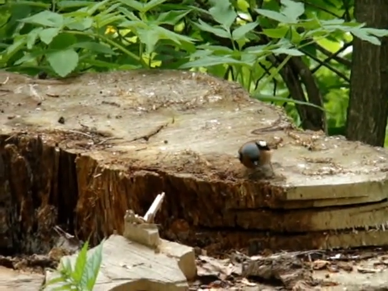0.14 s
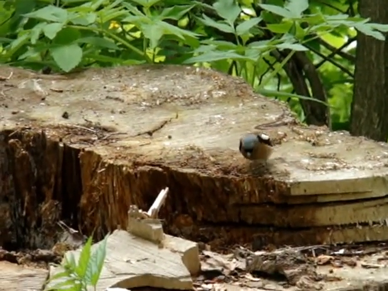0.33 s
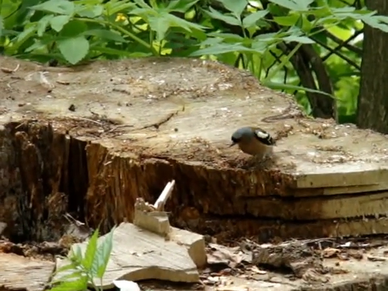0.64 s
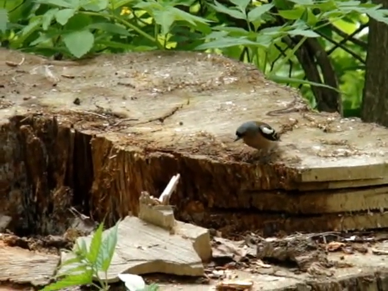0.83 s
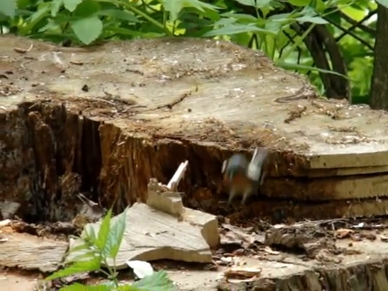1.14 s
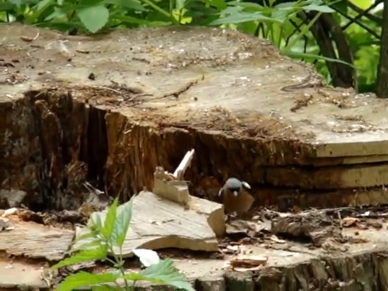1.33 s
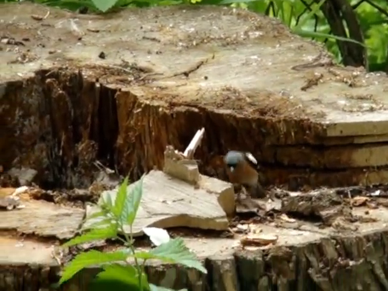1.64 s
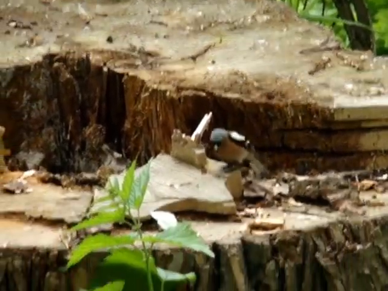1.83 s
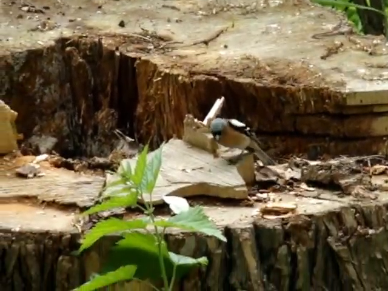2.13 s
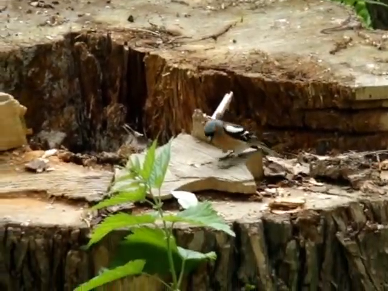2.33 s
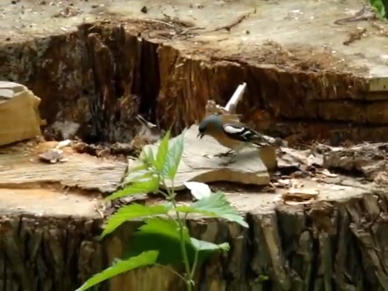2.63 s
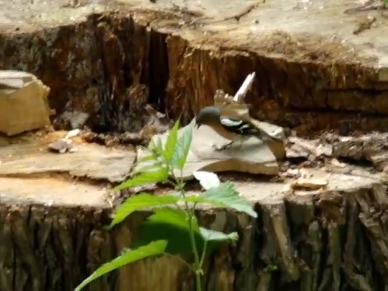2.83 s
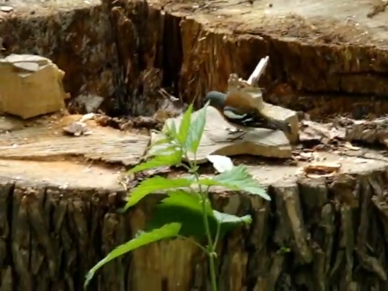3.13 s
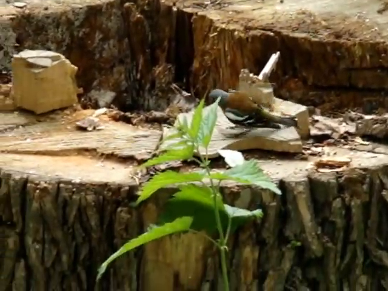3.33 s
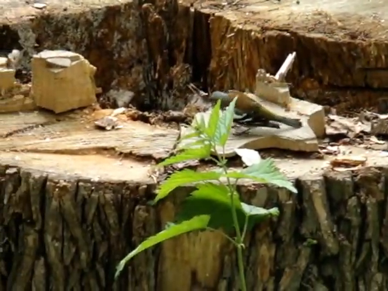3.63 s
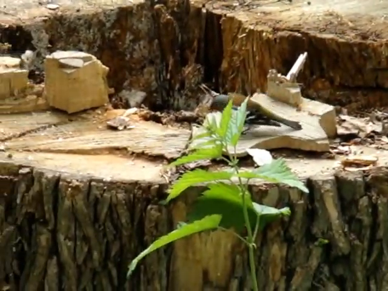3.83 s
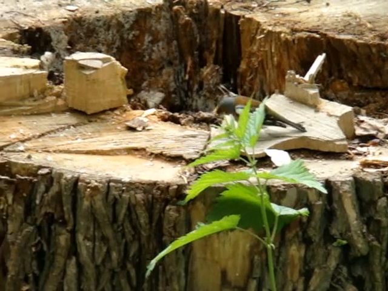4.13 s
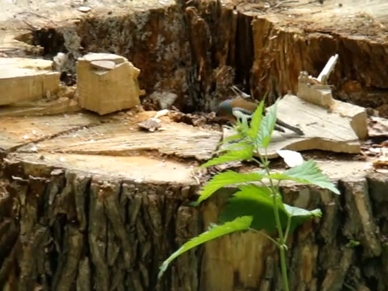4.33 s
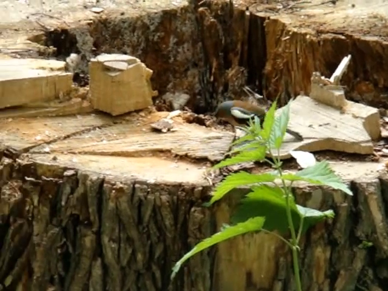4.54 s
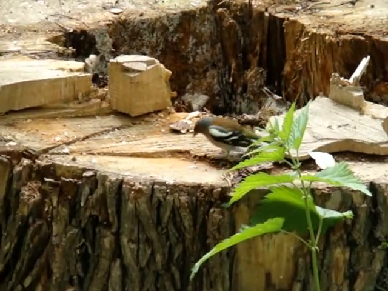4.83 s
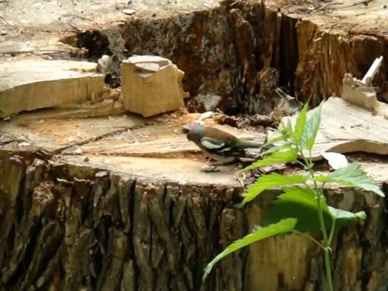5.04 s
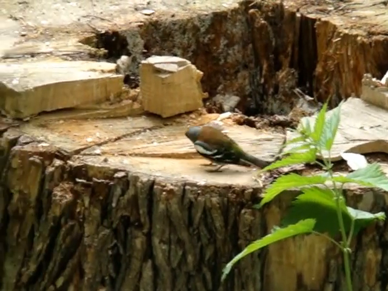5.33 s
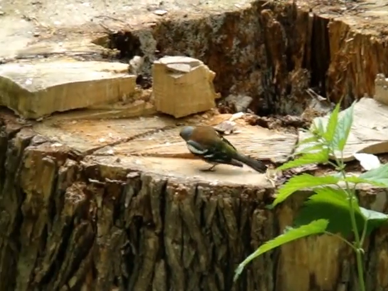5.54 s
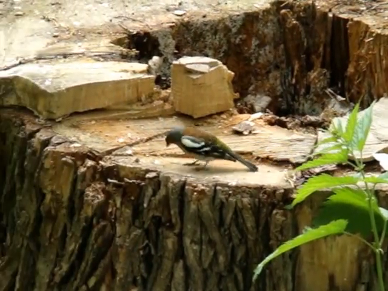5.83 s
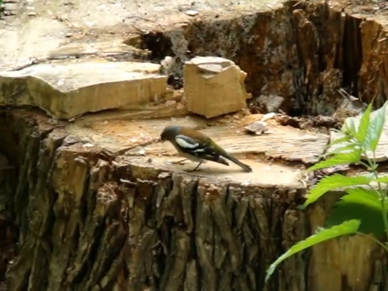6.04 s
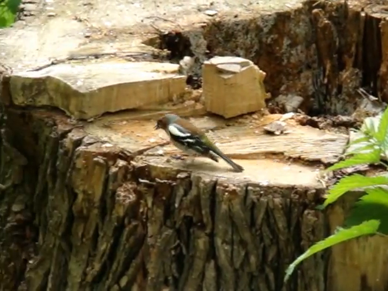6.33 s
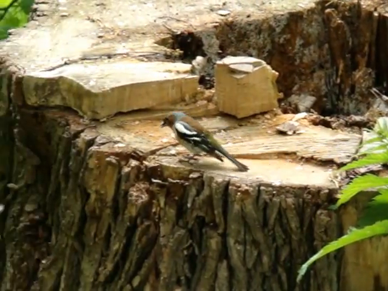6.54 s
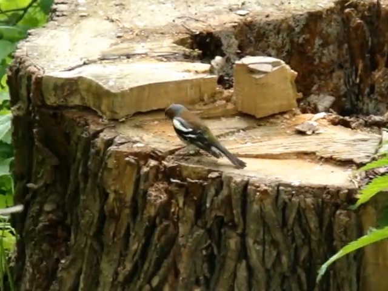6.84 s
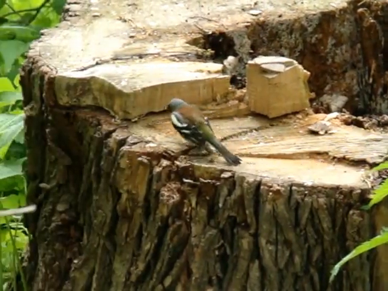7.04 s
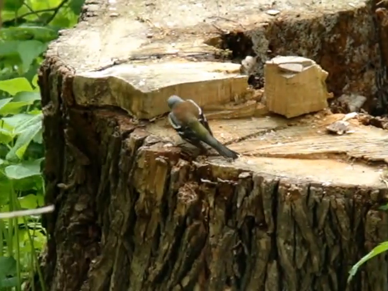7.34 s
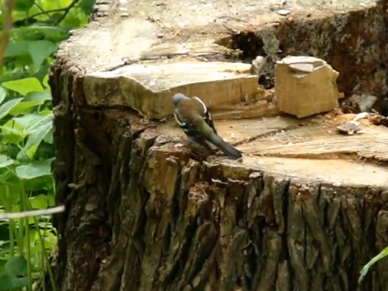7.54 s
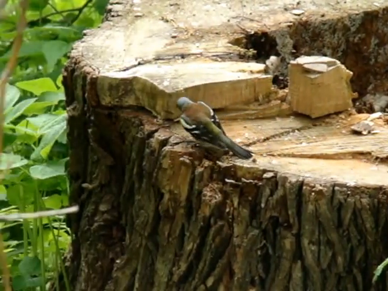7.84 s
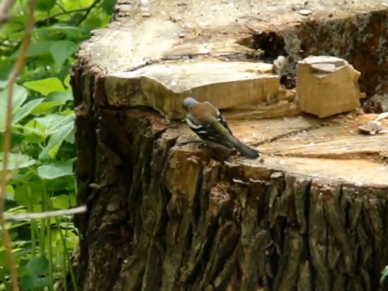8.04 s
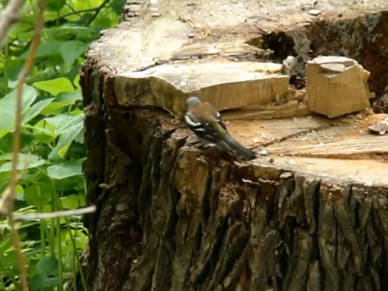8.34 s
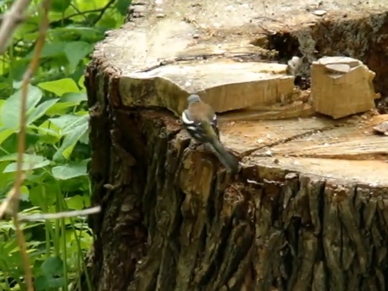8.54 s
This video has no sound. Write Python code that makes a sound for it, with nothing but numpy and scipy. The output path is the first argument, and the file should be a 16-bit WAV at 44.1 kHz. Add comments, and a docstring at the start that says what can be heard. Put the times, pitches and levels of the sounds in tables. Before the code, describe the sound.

A small songbird delivers the same rapid, descending song twice, each growing from thin, faint notes to strong sweeping whistles and a buzzy final flourish. Soft far chips follow the first song; clear falling whistles and a rising high hiss fill the gap. Everything sits over a gentle distant rush, in an open wood with short, leafy reverberation, heard in mono from a moderate distance.

```python
"""A chaffinch sings twice in a wood: thin notes, buzz-and-arch pairs, a trill, three swoops and a flourish.
Each syllable is a whistle with drawn pitch and level, some warbled into a buzz, echoed by trunks and leaves.
Farther birds, built the same way with other echo levels, call around and between the songs.
A high hiss of shaped noise swells between the songs; noise makes a soft rush and leaves, a sine a low hum."""
import sys
import numpy as np
from scipy import signal
from scipy.fft import rfft, irfft, next_fast_len
from scipy.io import wavfile
from scipy.ndimage import uniform_filter1d, map_coordinates

SR = 44100
rng = np.random.default_rng(int(sys.argv[2]) if len(sys.argv) > 2 else 0)


def persist_wave(psi):
    """Save psi, clipped to +-1, as 16-bit WAV."""
    counts = np.round(np.clip(psi, -1, 1) * 32767).astype(np.int16)
    wavfile.write(sys.argv[1], SR, np.atleast_2d(counts).T)


N = 383229

# Gestures and notes: nominal values, before the length and pitch ratios, level offsets and group gains.
# Thin lead-in note: time_s, pitch_hz, level_db
LEAD = [(0, 6270, -32), (.012, 6260, -5.5), (.018, 6250, -8), (.021, 5020, -6), (.028, 5500, 4),
        (.038, 5780, -12)]
# Buzz: time_s, pitch_hz, level_db, warble_depth_hz, warble_rate_hz
BUZZ = [(0, 5250, -16, 400, 180), (.012, 4900, -7, 500, 180), (.034, 4500, -1.5, 600, 130),
        (.046, 4150, 0, 700, 80), (.068, 3850, -2.5, 900, 72), (.079, 3900, -12, 900, 72)]
# Arch that closes a pair: time_s, pitch_hz, level_db
ARCH = [(0, 4840, -19), (.007, 5850, -1), (.014, 6630, -5.5), (.021, 6990, -8), (.0255, 8260, -34),
        (.032, 6530, -11.5), (.039, 5660, 0.5), (.046, 4860, -9.5)]
# Trill note: time_s, pitch_hz, level_db
TRILL = [(0, 4616, -14.5), (.009, 4940, -9.5), (.013, 6580, -18), (.017, 3925, -3), (.028, 3460, -2),
         (.036, 2750, -25), (.042, 3970, 1), (.047, 4700, -15)]
# Dip before a swoop: time_s, pitch_hz, level_db, warble_depth_hz, warble_rate_hz
DIP = [(0, 5050, -9, 200, 250), (.003, 4650, -1, 200, 250), (.008, 4200, -1, 100, 250),
       (.011, 3850, -9, 100, 250), (.016, 4450, -2, 200, 250), (.022, 5150, -12, 250, 250)]
# Quick flick before a swoop: time_s, pitch_hz, level_db
FLICK = [(0, 5300, -12), (.005, 4700, -10), (.008, 4000, 2), (.011, 3600, -12)]
# Swoop: time_s, pitch_hz, level_db
SWOOP = [(0, 2945, -20), (.008, 3260, -0.5), (.019, 3865, 0.5), (.024, 4200, -11), (.029, 3450, -6),
         (.035, 3190, 0)]
# Tumble that ends a swoop: time_s, pitch_hz, level_db
TUMBLE = [(0, 3357, -4), (.009, 2582, -19.5), (.019, 1747, -21), (.037, 3250, -9), (.054, 1790, -17.5)]
# Echoing ring at the start of each trill note and just before each swoop: time_s, pitch_hz, level_db
RING = [(0, 4494, -3.5), (.008, 4793, -2.5), (.018, 4950, -9)]
# Short rasp: time_s, pitch_hz, level_db, warble_depth_hz, warble_rate_hz
RASP = [(0, 3400, -25, 502, 199), (.008, 4210, 1, 804, 209), (.018, 4300, 1, 800, 200)]
# Sizzle: time_s, pitch_hz, level_db, warble_depth_hz, warble_rate_hz
SIZZLE = [(0, 3400, -14, 99.5, 172), (.005, 4900, -1, 293, 181.2), (.011, 8100, -5, 970, 168.4),
          (.02, 7540, -16, 1180, 168.7), (.03, 6400, -3, 1070, 170), (.041, 5300, -3, 1190, 168),
          (.048, 4860, -25, 1036, 166)]
# Tick on the slur: time_s, pitch_hz, level_db
TICK = [(0, 3160, -15), (.005, 3800, 1), (.01, 4900, -14)]
# Slur after the sizzles: time_s, pitch_hz, level_db
SLUR = [(0, 2000, -14), (.008, 2750, -6), (.016, 3250, 0), (.024, 3200, 0), (.032, 2750, -5),
        (.042, 2100, -12)]
# Final flourish: time_s, pitch_hz, level_db, warble_depth_hz, warble_rate_hz
FLOURISH = [(0, 3300, -12, 0, 74), (.004, 3650, 4, 0, 74), (.012, 4100, 4, 100, 74),
            (.018, 4400, -8, 800, 74), (.028, 4350, -3, 850, 67), (.064, 4300, -3.5, 850, 67),
            (.072, 3950, 3, 350, 190), (.088, 3600, -4, 450, 190), (.15, 2100, -19, 300, 190)]
# Thin high note: time_s, pitch_hz, level_db
THIN = [(0, 6350, -10), (.01, 6250, 0), (.028, 6200, -6), (.033, 5370, -14), (.06, 5350, -10)]

# Far chip: time_s, pitch_hz, level_db
CHIP = [(0, 2595, 3), (.005, 2390, -4.5), (.011, 2177, -3), (.017, 1900, -7), (.024, 1550, -20.5)]
# Far low pip: time_s, pitch_hz, level_db
PIP = [(0, 1505, 1), (.012, 1410, 2.5), (.03, 1370, -22)]
# Far falling whistle: time_s, pitch_hz, level_db
WHISTLE = [(0, 6600, -9), (.02, 5650, -2), (.038, 4850, 0), (.052, 4480, -2), (.072, 4250, -11)]
# Far note that falls, rises and falls again: time_s, pitch_hz, level_db
HOOK = [(0, 6200, -8), (.025, 5100, 0), (.048, 4400, -2), (.065, 4650, 0), (.085, 5100, -1),
        (.1, 4600, -10)]
# Far sagging note: time_s, pitch_hz, level_db
SAG = [(0, 5000, -11), (.07, 4920, -5), (.12, 4530, -3), (.17, 3940, -2)]
# Far downward slur: time_s, pitch_hz, level_db
DOWNSLUR = [(0, 3440, -9), (.018, 3500, 3), (.032, 3150, 3), (.045, 2780, -18)]
# Far upward slur: time_s, pitch_hz, level_db
UPSLUR = [(0, 2974, -13), (.025, 2975, -7), (.045, 3200, -1.5), (.058, 3800, 0)]
# Far high buzz: time_s, pitch_hz, level_db, warble_depth_hz, warble_rate_hz
SEEP = [(0, 7500, -3, 300, 120), (.03, 7240, 8.5, 407, 120.4), (.08, 7100, 2, 400, 120),
        (.12, 7100, -4, 302, 119)]
# Far held note: time_s, pitch_hz, level_db
HOLD = [(0, 4800, -10), (.04, 4750, 0), (.14, 4700, 0), (.2, 4650, -8)]

# Lead-in runs: start_s, repeats, first_gap_s, gap_loss_s, level_db, step_db, pitch_ratio
LEADS = [(1.199, 3, .085, 0.0024, -42, 3.5, 0.98)]
# Thin-note runs: start_s, repeats, first_gap_s, gap_loss_s, level_db, step_db, pitch_ratio
THINS = [(5.915, 3, .0865, 0, -42, 4.3, 1.005)]
# Buzz-and-arch runs: start_s, repeats, first_gap_s, gap_loss_s, level_db, step_db, pitch_ratio
PAIRS = [(1.452, 4, .204, 0.0036, -30.5, 3.1, 1), (6.17, 6, .2195, .0055, -30.5, 1.7, 1)]
# Trill runs: start_s, repeats, first_gap_s, gap_loss_s, level_db, step_db, pitch_ratio
TRILLS = [(2.236, 6, .0706, 0.0012, -25.5, 1, 0.99), (7.388, 5, .0717, 0, -24, 0.39, 0.97)]
# Swoop runs: start_s, repeats, first_gap_s, gap_loss_s, level_db, step_db, pitch_ratio
SWOOPS = [(2.714, 3, .188, 0.00038, -18.5, 0.15, 1), (7.802, 3, .191, 0.0028, -21.5, 0, 0.99)]
# Far couplet runs: start_s, repeats, first_gap_s, gap_loss_s, level_db, step_db, pitch_ratio
COUPLETS = [(3.201, 4, .324, 0.011, -34.5, 0.015, 0.97)]

# Dips: start_s, level_db, pitch_ratio, length_ratio
DIPS = [(2.67, -22, 1.087, 1.9), (7.757, -22.5, 1.03, 1.3), (7.949, -21.5, 1, 1), (8.139, -21.5, 1.005, 1)]
# Flicks: start_s, level_db, pitch_ratio, length_ratio
FLICKS = [(2.861, -24.5, 0.98, 1), (3.046, -21, 0.99, 0.96)]
# Rasps: start_s, level_db, pitch_ratio, length_ratio
RASPS = [(3.739, -34, .935, 1), (3.763, -41, 1, 0.73)]
# Endings, from the first sizzle: start_s, level_db, pitch_ratio
ENDINGS = [(3.231, -30.5, 0.99), (8.323, -31.5, .96)]
# Flourishes: start_s, level_db, pitch_ratio
FLOURISHES = [(3.44, -24.5, .98), (8.539, -24.5, 1.02)]
# Far held notes: start_s, level_db, pitch_ratio, length_ratio
HOLDS = [(0, -55, .95, .6), (.12, -54, .8, .8)]
# Far high buzzes: start_s, level_db, pitch_ratio, length_ratio
SEEPS = [(.12, -62, 1, 1), (.53, -66, .93, 1.3), (1.849, -50, 0.99, 0.39), (2.829, -56.5, 1.02, 1.2),
         (4.2, -55.5, .8, 0.67), (5.95, -43, 0.96, 0.52)]
# Far sagging notes: start_s, level_db, pitch_ratio, length_ratio
SAGS = [(.41, -55, 1, 1), (1.56, -55, .54, .9)]
# Far downward slurs: start_s, level_db, pitch_ratio, length_ratio
DOWNSLURS = [(.857, -44.5, 0.98, 0.98)]
# Far upward slurs: start_s, level_db, pitch_ratio, length_ratio
UPSLURS = [(1.108, -39, 0.96, 0.99)]
# Far whistles: start_s, level_db
WHISTLES = [(4.53, -44), (4.8, -44), (4.975, -41), (5.572, -40), (5.785, -41), (5.96, -41)]
# Far hooks: start_s, level_db
HOOKS = [(5.21, -42), (5.368, -41)]

# Spectrum shape of the distant rush: freq_hz, relative_density_db
RUSH = [(15, -63), (25, -27), (82, -10.5), (97, -9), (114, -15.5), (139, -12.5), (421, -7.5), (579, -3.5),
        (633, -3), (949, -1.5), (1240, -4), (1420, -6), (1700, -14.5), (2210, -36.5), (3740, -120)]
# Spectrum shape of the leaves: freq_hz, relative_density_db
LEAVES = [(880, -46), (1500, -5.5), (2950, -9.5), (3680, -9.5), (4180, -10), (4590, -12), (5920, -16.5),
          (7280, -19.5), (10000, -25), (13000, -87), (22000, -120)]
# Spectrum shape of the high hiss: freq_hz, relative_density_db
HISS = [(2500, -18.5), (3600, 0), (4600, -2), (5900, 0.5), (6600, 4), (7400, -6), (8200, -16), (9500, -17),
        (10500, -41)]
# Decay of the wood's long wash: freq_hz, t60_s
WOOD = [(1500, 0.32), (4000, 0.43), (6500, 0.56), (10000, 0.37)]

ARCH_DELAY_S, ARCH_DB, ARCH_PITCH_RATIO = .102, -27.5, .97
ARCH_FOLLOWS = 0.22  # share of the buzz's crescendo
FULL_BUZZ_DB = -24  # buzz crescendo stops here
TUMBLE_DELAY_S = .034
SIZZLE_GAP_S, SLUR_DELAY_S = .07, .153
CHIP_GAP_S, PIP_DELAY_S, PIP_DB = .119, .047, -5.5
HISS_START_S, HISS_PEAK_S, HISS_ATTACK_S = 4.39, 5.78, 0.015
HISS_PEAK_DB, HISS_RISE_DB_PER_S, HISS_FALL_DB_PER_S = -38, 4, 34.5
RUSH_DB, RUSH_SINK_DB_PER_S = -44.4, 0.1559
GUST_S, GUST_WIDTH_S, GUST_DB = 5.83, 0.36, 2
TOP_HZ = 10150


def amp(db):
    """Decibels to gain."""
    return 10 ** (np.asarray(db) / 20)


def unit(x):
    """Scale to rms 1."""
    return x / np.sqrt(np.mean(x ** 2) + 1e-20)


def along(points, hz):
    """(Hz, value) points read on a log frequency axis."""
    point_hz, values = np.transpose(points)
    return np.interp(np.log(hz + 1), np.log(point_hz + 1), values)


def wobble(knots_per_s, size):
    """A smooth random curve: a spline through random knots."""
    knots = rng.standard_normal(int(size * knots_per_s / SR) + 4)
    return map_coordinates(knots, [np.arange(size) * knots_per_s / SR])


def filtered(x, response):
    """x times a response of frequency, zero-padded against wrap-around."""
    m = next_fast_len(N + SR // 2)
    return irfft(rfft(x, m) * response(np.fft.rfftfreq(m, 1 / SR)), m)[:N]


def noise(spectrum, patchy_db):
    """Coloured noise of rms 1 with drifting time-frequency patches of gain."""
    z = signal.stft(rng.standard_normal(N), nperseg=512)[2]
    field = uniform_filter1d(rng.standard_normal(z.shape), 5, 0)
    field = uniform_filter1d(field, 16, 1)
    patchy = signal.istft(z * amp(patchy_db * unit(field)), nperseg=512)[1][:N]
    return unit(filtered(patchy, lambda hz: amp(along(spectrum, hz))))


def background():
    """A sinking distant rush that swells once, a faint hiss of leaves and a wavering low hum."""
    t = np.arange(N) / SR
    gust_db = GUST_DB * np.exp(-((t - GUST_S) / GUST_WIDTH_S) ** 2)
    rush_db = RUSH_DB - RUSH_SINK_DB_PER_S * t + gust_db
    rush = amp(rush_db) * noise(RUSH, patchy_db=0.57)
    leaves = amp(-48.5) * noise(LEAVES, patchy_db=2.0)
    hum_hz = 88 + 1.826 * wobble(9, size=N)
    hum_db = -64.0 + 2.5 * wobble(7.7, size=N)
    hum = amp(hum_db) * np.sin(2 * np.pi * np.cumsum(hum_hz) / SR)
    return rush + leaves + hum


def add(track, start_s, sound):
    """Mix a sound into the track."""
    part = track[round(start_s * SR):][:len(sound)]
    part += sound[:len(part)]


def syllable(gesture, pitch=1, length=1, jitter=0.0055, flutter_db=0, uneven=.06,
             throat_hz=4100, skirt_db_per_octave=14, overtone_db=-34):
    """One nearly pure whistle; a fast, uneven swing of its pitch makes it buzz."""
    time_s, *columns = np.transpose(gesture)
    time_s = np.maximum.accumulate(time_s) * length
    t = np.arange(int(time_s[-1] * SR)) / SR
    curves = [uniform_filter1d(np.interp(t, time_s, c), size=64, mode="nearest") for c in columns]
    hz, db, *warble = curves
    if warble:
        depth_hz, rate_hz = warble
        uneven_rate_hz = rate_hz * (1 + uneven * wobble(195.8, size=len(t)))
        swung_hz = hz + depth_hz * np.sin(2 * np.pi * np.cumsum(uneven_rate_hz) / SR)
        # each swing is loudest nearest the throat resonance
        octaves_off = abs(np.log2(swung_hz / throat_hz)) - abs(np.log2(hz / throat_hz))
        db = db - skirt_db_per_octave * octaves_off
        hz = swung_hz
    jittered_hz = hz * pitch * (1 + jitter * wobble(500, size=len(t)))
    phase = 2 * np.pi * np.cumsum(jittered_hz) / SR
    fade = np.minimum(1, np.minimum(t, t[-1] - t) / .0015)
    voice = np.sin(phase) + amp(overtone_db) * np.sin(2 * phase)
    level = amp(db + flutter_db * wobble(313.4, size=len(t)))
    return np.sqrt(2) * fade * level * voice


def woodland(sound, trunk_db, near_db, far_db, near_t60_s=0.25, build_s=0.047):
    """Direct sound, echoes off ground and trunks, scatter from branches and the long wash of the wood."""
    hz, frame_s, z = signal.stft(rng.standard_normal(SR * 3 // 4), SR, nperseg=256)
    decay = amp(-60 * frame_s / along(WOOD, hz)[:, None])
    wash = signal.istft(z * decay, SR, nperseg=256)[1]
    t = np.arange(len(wash)) / SR
    wash *= 1 - np.exp(-t / build_s)
    # cubed noise: sparse, spiky reflections
    branches = rng.standard_normal(len(t)) ** 3 * amp(-60 * t / near_t60_s) * (t > .003)
    response = amp(near_db) * branches / np.linalg.norm(branches)
    response += amp(far_db) * wash / np.linalg.norm(wash)
    response[(SR * rng.uniform(.003, .02, size=3)).astype(int)] += amp(trunk_db)
    response[0] += 1
    return signal.fftconvolve(sound, response)


def sing(phrases, trunk_db, near_db, far_db, flutter_db):
    """Every syllable takes its own paths through the trees."""
    track = np.zeros(N)
    for gesture, notes in phrases:
        for start_s, db, *shape in notes:
            whistle = syllable(gesture, *shape, flutter_db=flutter_db)
            add(track, start_s, amp(db) * woodland(whistle, trunk_db, near_db, far_db))
    return track


def repeats(runs, scatter_db=0.1, scatter_pitch=0.0062):
    """Notes (start_s, level_db, pitch_ratio) of runs with stepped gap and level, randomly scattered."""
    notes = []
    for start_s, count, gap_s, gap_loss_s, db, step_db, pitch in runs:
        for k, (a, b) in enumerate(rng.standard_normal((round(count), 2))):
            note_s = start_s + k * gap_s - gap_loss_s * k * (k - 1) / 2
            note_db = db + k * step_db + scatter_db * a
            notes.append((note_s, note_db, pitch * (1 + scatter_pitch * b)))
    return notes


def after(notes, delay_s, db=0, length=1):
    """Copies of notes, shifted by delay_s and db, with a length ratio."""
    return [(s + delay_s, level_db + db, pitch, length) for s, level_db, pitch in notes]


def far_birds():
    """Chips and pips, clear slurs, held notes and faint high buzzes, whistled deeper in the wood."""
    couplets = repeats(COUPLETS)
    calls = couplets + [(s + CHIP_GAP_S, db, pitch) for s, db, pitch in couplets]
    chip_notes = after(calls, 0.00205, length=0.79)
    chips = sing([(CHIP, chip_notes)], trunk_db=-11, near_db=-1.5, far_db=1, flutter_db=2.0)
    slurs = [(WHISTLE, WHISTLES), (HOOK, HOOKS), (SAG, SAGS), (DOWNSLUR, DOWNSLURS), (UPSLUR, UPSLURS)]
    clear = sing(slurs, trunk_db=-14.5, near_db=-13.5, far_db=-8.0, flutter_db=2.5)
    pip_notes = after(calls, PIP_DELAY_S, db=PIP_DB, length=0.82)
    faint = [(PIP, pip_notes), (SEEP, SEEPS), (HOLD, HOLDS)]
    blurred = sing(faint, trunk_db=-19, near_db=0, far_db=-3.5, flutter_db=4.0)
    return amp(0.3) * chips + amp(-1.0) * clear + amp(-6.0) * blurred


def arches(pairs):
    """Each buzz is answered by an arch, which shares only part of its crescendo."""
    mean_db = np.mean([db for s, db, pitch in pairs])
    return [(s + ARCH_DELAY_S, ARCH_DB + ARCH_FOLLOWS * (db - mean_db), pitch * ARCH_PITCH_RATIO)
            for s, db, pitch in pairs]


def chaffinch():
    """Whistled song, from thin high notes down to the loud swoops and the final flourish."""
    pairs = repeats(PAIRS, scatter_db=0.16)
    trills = repeats(TRILLS, scatter_db=.5)
    swoops = repeats(SWOOPS, scatter_db=0.0)

    leads = after(repeats(LEADS), 0, length=.85)
    thins = repeats(THINS, scatter_pitch=0.0018)
    high = [(LEAD, leads), (THIN, thins), (ARCH, arches(pairs))]
    opening = sing(high, trunk_db=-14, near_db=-15.5, far_db=-10.0, flutter_db=4.0)

    buzz_notes = [(s, min(db, FULL_BUZZ_DB), pitch, .92) for s, db, pitch in pairs]
    rough = [(BUZZ, buzz_notes), (RASP, RASPS)]
    buzzes = sing(rough, trunk_db=-8.5, near_db=-10, far_db=-4.5, flutter_db=3.5)

    trill = sing([(TRILL, trills), (DIP, DIPS)], trunk_db=-17, near_db=-7.0, far_db=-6.0, flutter_db=2.5)

    # heard mostly as echo
    rings = trills + after(swoops, -0.035, db=-4)
    ringing = sing([(RING, rings)], trunk_db=-11, near_db=3.5, far_db=8, flutter_db=6.5)

    swoop_parts = [(FLICK, FLICKS), (SWOOP, swoops), (TUMBLE, after(swoops, TUMBLE_DELAY_S))]
    swooping = sing(swoop_parts, trunk_db=-19, near_db=-7.5, far_db=-7, flutter_db=2.4)

    twice = after(ENDINGS, 0, length=1.08) + after(ENDINGS, SIZZLE_GAP_S, db=1.2, length=1.08)
    sizzles = sing([(SIZZLE, twice)], trunk_db=-7, near_db=-5.5, far_db=-7, flutter_db=3)

    ticks = after(ENDINGS, SLUR_DELAY_S, db=6.5)
    slurs = after(ENDINGS, SLUR_DELAY_S, db=0.5)
    close = [(TICK, ticks), (SLUR, slurs), (FLOURISH, FLOURISHES)]
    ending = sing(close, trunk_db=-17.5, near_db=-9.5, far_db=-7, flutter_db=3.0)

    return (amp(0.7) * opening + amp(-3.1) * buzzes + amp(-1.8) * trill + amp(-20.0) * ringing
            + amp(-1.5) * swooping + amp(-2) * sizzles + amp(-1.6) * ending)


def high_hiss():
    """Bright noise that sets in quickly, grows steadily, shivers and dies away between the songs."""
    t = np.arange(N) / SR
    rise_db = HISS_RISE_DB_PER_S * (t - HISS_PEAK_S)
    fall_db = HISS_FALL_DB_PER_S * (HISS_PEAK_S - t)
    swell_db = HISS_PEAK_DB + np.minimum(rise_db, fall_db)
    shiver_db = 1.3 * wobble(40, size=N)
    onset = np.clip((t - HISS_START_S) / HISS_ATTACK_S, 0, 1)
    return onset * amp(swell_db + shiver_db) * noise(HISS, patchy_db=1.9)


def scene():
    """Sum of all sources, one channel."""
    return (background() + far_birds() + chaffinch() + high_hiss())[None]


def record(dry):
    """Band limit: keep only what lies below TOP_HZ."""
    return filtered(dry[0], lambda hz: hz < TOP_HZ)[None]


dry = scene()
out = record(dry)
persist_wave(out)
```